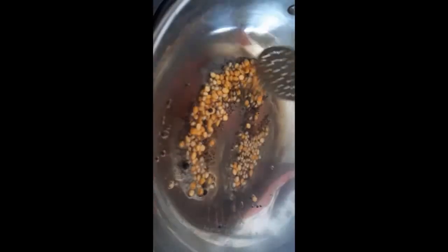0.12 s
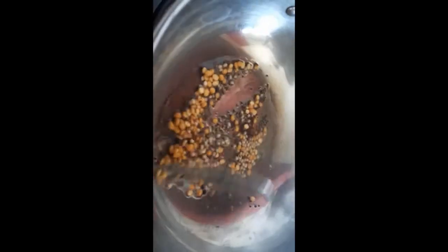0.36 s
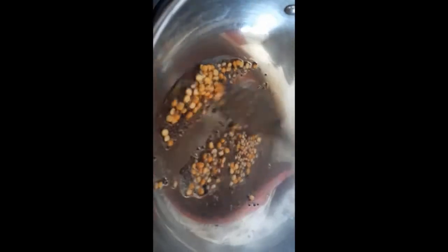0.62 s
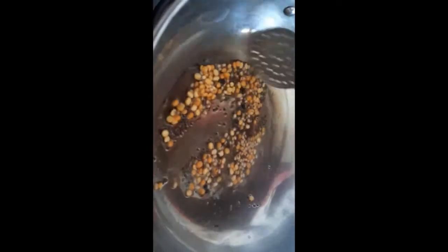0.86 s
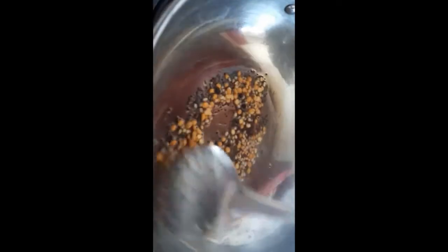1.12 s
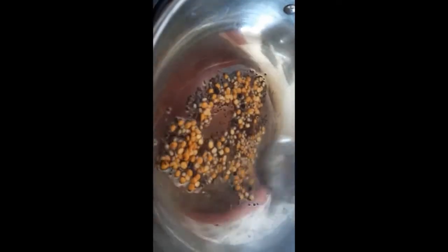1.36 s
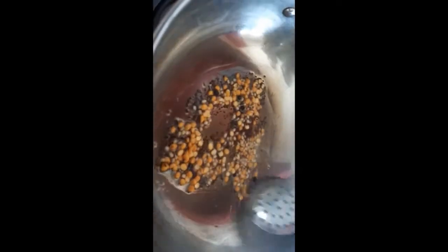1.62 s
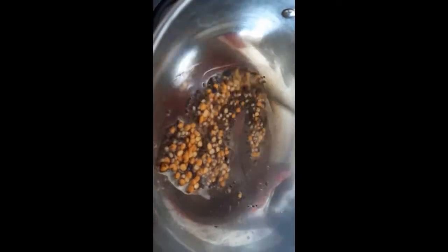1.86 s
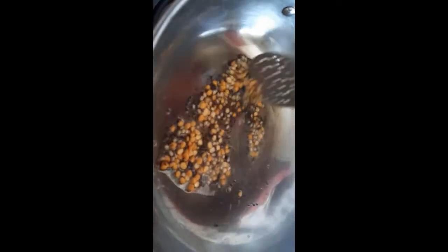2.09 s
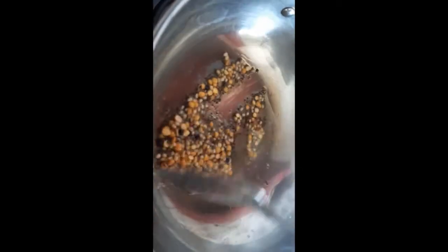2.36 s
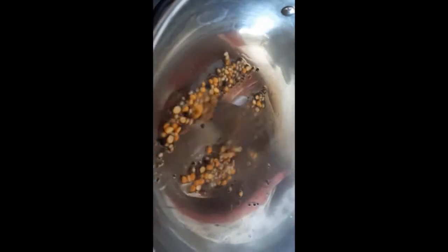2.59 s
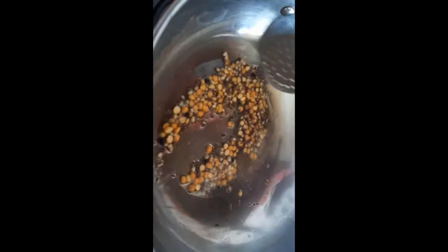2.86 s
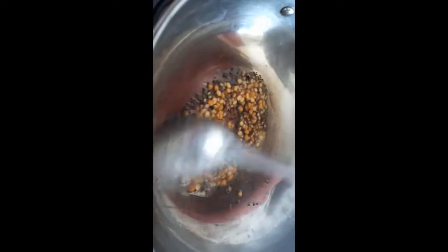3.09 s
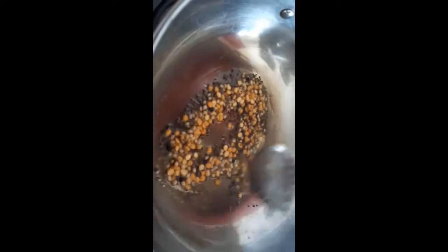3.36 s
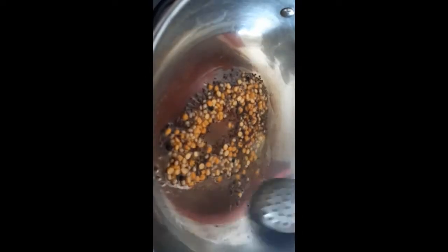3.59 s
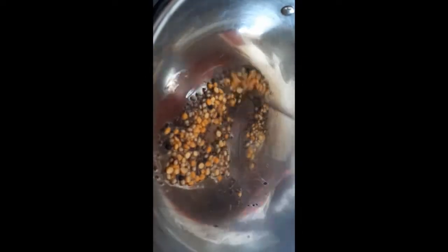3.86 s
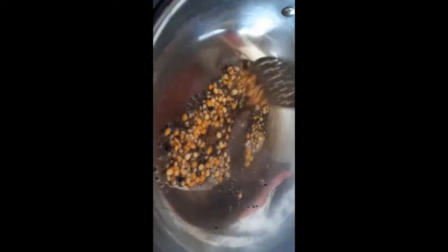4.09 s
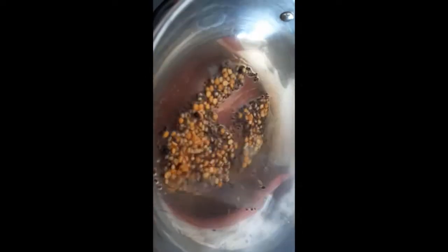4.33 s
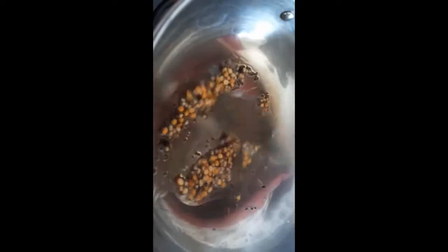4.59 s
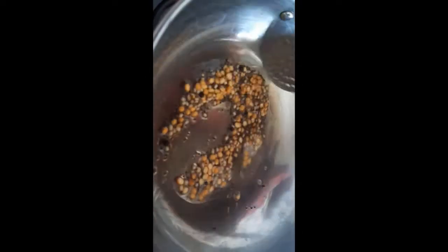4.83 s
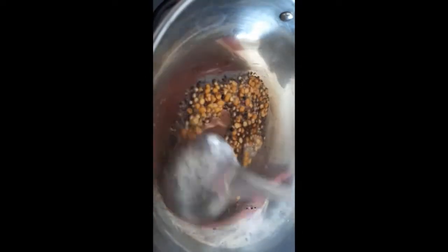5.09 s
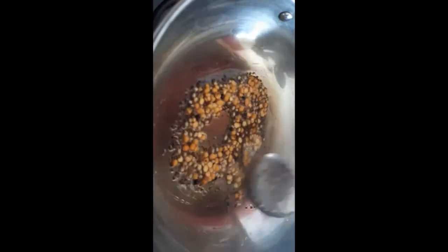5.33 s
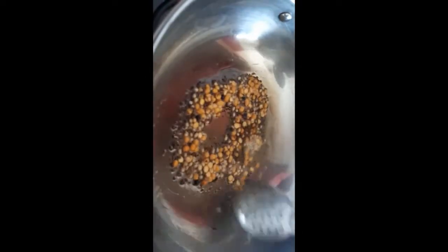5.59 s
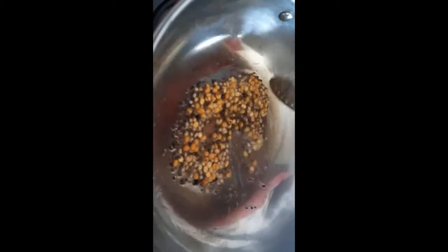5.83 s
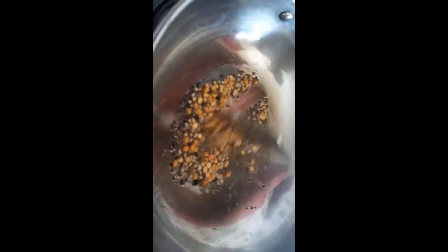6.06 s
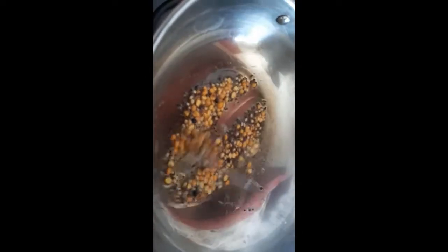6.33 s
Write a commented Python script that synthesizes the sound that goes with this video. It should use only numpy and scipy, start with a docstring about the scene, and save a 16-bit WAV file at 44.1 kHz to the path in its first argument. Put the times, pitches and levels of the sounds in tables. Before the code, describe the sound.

Heard very close in stereo, a steel utensil taps and drags seeds around a metal pan in a kitchen with little echo. Short, quickly damped clanks lead into crisp granular scrapes, at irregular gaps of a fraction of a second. Brief metallic squeaks and a few sharp snaps dot the pauses. The later knocks are strongest, some thumping the stove, over a faint steady oil hiss and fluttering low burner rumble.

```python
"""A steel skimmer stirs seeds and lentils frying in oil in a steel pan, heard close by in stereo. A knock comes
almost at once: a crack and a clatter of clicks that ring the pan. The strokes follow unevenly, each dragging
seeds (dense clicks) between squeaks (gliding noise), pops (single clicks) and spits (noise bursts). From 1.6 s
the harder knocks also thump the stove (a damped low tone), loudest at 3.6 s; the last knock comes just before
the end. Throughout, oil hisses and the flame rumbles below: coloured noise, and noise ringing at two low
pitches."""
import sys
import numpy as np
from scipy import signal
from scipy.fft import rfft, irfft, next_fast_len
from scipy.io import wavfile

SR = 44100
rng = np.random.default_rng(int(sys.argv[2]) if len(sys.argv) > 2 else 0)


def level_to_linear(level):
    """Convert decibel levels to linear amplitude factors, elementwise."""
    exponent = np.asarray(level, float) / 20
    return 10 ** exponent


def to_wav(s):
    """Save 16-bit WAV."""
    ch = np.atleast_2d(s).T  # columns
    pcm = np.round(np.clip(ch, -1, 1) * 32767)  # PCM
    wavfile.write(sys.argv[1], SR, pcm.astype(np.int16))


N = 284263   # length in samples

# The skimmer landing on steel. Each row: time of full force in seconds, strength in dB, deep part in dB
# relative to it, treble part in dB relative to it (all trebles are raised alike later), and the time in
# seconds in which the rattle falls by 60 dB.
LANDINGS = [(0.1068, -12, -13.5, -9.5, 0.021), (0.2239, -27, -17, -42, 0.092), (0.4125, -42, -16, -7, 0.08),
            (0.5075, -41, -37, -12, 0.12), (0.5299, -16.5, -11.5, -15.5, 0.058),
            (0.8779, -16.5, -21.5, -9, 0.041), (1.1335, -32, -24, -27, 0.063),
            (1.232, -25.5, -20, -11, 0.068), (1.608, -14, -22, -10, 0.073), (1.694, -22, -30, -14, 0.069),
            (1.7562, -21.5, -21.5, -15, 0.053), (2.072, -20.5, -17.5, -6.5, 0.057),
            (2.11, -32.5, -24, -4.5, 0.086), (2.507, -14, -15.5, -15, 0.087),
            (2.9013, -39, -28, -10.5, 0.026), (3.007, -20.5, -24, -22, 0.041),
            (3.257, -22.5, -22, -15, 0.046), (3.307, -37, -33, -3, 0.018),
            (3.6232, -5.5, -21.5, -16.5, 0.043), (4.0906, -19.5, -13.5, -4.5, 0.027),
            (4.4847, -8.5, -17.5, -15, 0.066), (4.802, -47, -34, -13, 0.045),
            (4.8728, -21, -16.5, -4, 0.047), (5.047, -50, -24, -19, 0.046), (5.13, -28.5, -16.5, -12, 0.12),
            (5.5387, -11, -22, -10, 0.047), (5.5857, -24, -44, -16, 0.033),
            (5.6064, -18.5, -21, -9.5, 0.059), (5.661, -24.5, -42, -12.5, 0.058),
            (5.9409, -3.5, -10.5, -15, 0.02), (6.2971, -32, -7.5, -22, 0.08),
            (6.4194, -12, -30, -13.5, 0.0096)]
# The blade dragging over the steel. Each row: time of full contact in seconds, length in seconds, level on
# landing in dB, level at lift in dB, treble relative to the rest in dB.
DRAG_STROKES = [(0.161, 0.055, -48, -47, 5), (0.267, 0.14, -57, -55.5, -7), (0.548, 0.079, -55, -46, -4.5),
                (0.91, 0.099, -45.5, -52, 6), (1.065, .19, -45.5, -49, 3.5), (1.618, 0.13, -36, -45, 4),
                (1.798, .14, -49.5, -61.5, 0), (2.095, 0.06, -48.5, -49, 7.5),
                (2.222, 0.099, -67, -54.5, -13), (2.525, 0.1, -45.5, -50, -2.5),
                (2.927, 0.13, -57, -44, -0.5), (3.017, 0.28, -49.5, -44.5, 4),
                (3.648, 0.18, -34.5, -47.5, 2.5), (4.103, 0.065, -40, -45.5, 6),
                (4.25, 0.11, -57, -62.5, -20), (4.515, 0.086, -43, -47.5, 1.5),
                (4.881, 0.13, -49.5, -50, 7), (5.048, 0.17, -45, -51.5, 4.5),
                (5.549, 0.13, -44.5, -40, -0.5), (5.947, 0.077, -37.5, -41.5, 2.5),
                (6.1, 0.18, -56.5, -60.5, -21), (6.285, 0.19, -57, -41.5, -2.5)]
# Seeds jiggling in the oil between strokes. Each row: time in seconds, level in dB.
SEED_JIGGLE = [(0.0, -69.5), (0.45, -71), (0.85, -67), (1.5, -60), (2.0, -87), (2.85, -69.5), (3.5, -65.5),
               (4.0, -81), (4.8, -75), (5.45, -67.5), (5.9, -64), (6.44, -68)]
# Single seeds that burst or snap against the steel. Each row: time in seconds, strength in dB.
SEED_POPS = [(0.3881, -36), (1.866, -34), (1.946, -33.5), (4.4941, -14), (5.9513, -19), (6.2178, -42),
             (6.3143, -33), (6.421, -39)]
# Thin bright spits of oil. Each row: time in seconds, strength in dB.
OIL_SPITS = [(0.446, -34.5), (2.369, -46), (2.47, -69), (4.002, -49.5), (4.4226, -34), (5.475, -47.5),
             (6.389, -38)]
# The ringing tones (modes) of the pan. Each row: pitch in Hz, relative strength in dB, time in seconds to
# fall by 60 dB.
PAN_MODES = [(584.1, -4.5, 0.11), (527, -15, 0.082), (643.3, -13.5, 0.11), (664.6, -16.5, 0.17),
             (778, -19.5, 0.15), (1005.4, -8, 0.11), (1100, -4.5, 0.042), (1267, -4, 0.014),
             (1334, -39, 0.026), (1659, -4.5, 0.055), (1944, -14, 0.097), (2100, -62, 0.13),
             (2550, -57, .1), (2660, -37, 0.047), (3100, -42, 0.035), (3440, -48, 0.047), (3590, -7, 0.047),
             (4223, -16, 0.033), (4300, -14, 0.1), (4943, 7, 0.0093), (5442, 0, 0.035), (6040, 1, 0.051),
             (6230, -3.5, 0.02), (6440, -30, 0.073), (7080, -36, 0.051), (8010, -29, 0.026),
             (11330, -24.5, 0.11), (12930, -23, .05)]
# The dense, short-lived modes between them. Each row: frequency in Hz, relative strength in dB per Hz.
METAL_PUFF = [(120, 7), (250, 13), (600, -2.5), (1100, 12.5), (1700, 3.5), (2500, 13.5), (4000, 13),
              (6500, 10), (7800, 9), (8800, -20), (10500, -4), (13400, -7.5), (15800, -13.5)]
# Dull nudges that wake the low modes of the pan. Each row: time in seconds, strength in dB.
PAN_NUDGES = [(0.132, -33), (0.18, -38), (0.3, -37.5), (0.356, -45), (0.532, -32), (0.878, -42),
              (0.914, -32.5), (1.072, -34.5), (1.608, -33), (1.696, -46), (2.101, -32.5), (2.265, -39),
              (2.35, -48.5), (2.924, -31), (3.008, -36), (3.124, -37), (3.161, -37), (3.682, -44),
              (4.117, -28), (4.211, -41), (4.283, -37.5), (4.378, -43), (4.571, -38.5), (4.874, -31),
              (5.108, -35), (5.541, -31.5), (5.875, -44.5), (5.941, -32), (6.162, -35.5), (6.22, -42.5),
              (6.361, -32)]
# The blade singing as it skims the steel. Each row: start in seconds, length in seconds, start pitch in Hz,
# end pitch in Hz, level at the middle in dB.
BLADE_SQUEAKS = [(0.22, 0.046, 1070, 1084, -43), (1.12, 0.045, 1350, 1426, -45.5),
                 (1.192, 0.039, 1240, 1290, -48.5), (1.549, 0.068, 3280, 3300, -58.5),
                 (1.695, 0.13, 1178, 1100, -49.5), (1.735, .1, 740, 763, -52.5),
                 (2.134, 0.047, 1100, 1100, -61), (2.953, .03, 3300, 3280, -54),
                 (3.154, 0.057, 1344, 1327, -45.5), (3.713, 0.037, 2360, 2410, -47),
                 (3.762, 0.11, 680, 702, -51), (3.804, 0.023, 1070, 1120, -43.5),
                 (4.22, .14, 1052, 1042, -62), (4.967, 0.1, 2050, 2090, -56.5),
                 (4.999, 0.098, 1090, 1104, -56.5), (5.42, 0.05, 3300, 3250, -65),
                 (5.465, 0.04, 2850, 2800, -63.5), (6.002, 0.052, 1070, 1085, -39)]
# The pan rocking and thumping the stove. Each row: time in seconds, strength in dB.
STOVE_THUMPS = [(0.1044, -55), (1.6075, -12.5), (2.509, -80), (3.001, -36), (3.6231, -5.5), (4.4836, -15.5),
                (5.9408, -11), (6.296, -33.5), (6.4209, -20)]
# Colour of the oil hiss. Each row: frequency in Hz, relative strength in dB per Hz.
OIL_HISS = [(18, -50), (30, -40), (130, 8), (198, -10), (244, -8.5), (435, -15), (581, -19.5), (645, -18),
            (1420, -28), (3280, -22.5), (4860, -36), (5990, -25), (9350, -28), (11800, -24.5),
            (15800, -30.5)]
# Resonances in the flame's rumble. Each row: pitch in Hz, width in Hz, level in dB.
FLAME_RESONANCES = [(125.5, 12.4, -65.5), (196.2, 13.6, -64)]
# How the two microphones differ. Each row: frequency in Hz, likeness from 0 to 1, left minus right in dB.
MICROPHONES = [(40, 0.97, 26), (126, 1, 1), (292, 0.84, 0.5), (655, 0.76, 4.5), (1500, 0.36, 0),
               (3140, 0.51, -3), (7740, 0.45, 1.5), (15200, 0.63, 17)]

SPLIT_HZ, TOP_HZ = 1506, 9200   # borders between the deep, middle and top parts
LAND_S, LIFT_DB_PER_S = 0.014, 253   # fade-in of a drag; how fast it dies once the blade lifts
# pushed seeds roll on: level after a -48.5 dB lift, share of the lift level, decay, loss of treble
ROLL_DB, ROLL_FOLLOWS, ROLL_DB_PER_S, ROLL_DULL_DB = -56.5, 0.9, 80.5, -4
# jolts of the deep modes: level relative to a -48 dB drag, and their share of its swing
DEEP_DB, DEEP_FOLLOWS = -7, 0.82
SPIT_T60_S, SPIT_BODY_DB = 0.037, -24   # time to fall by 60 dB; middle relative to treble
STEEL_T60_S, SPOTS = 0.012, 16   # fall of the metallic puff; number of spots on the pan
# the contact is too soft for higher modes; each nudge favours other modes
NUDGE_SOFT_HZ, NUDGE_SPREAD_DB = 695, 3
ROCK_DB, ROCK_T60_S = -38, 0.45   # after a nudge the pan keeps trembling on its stand
SQUEAK_WIDTH_HZ = 85   # corner of the slow noise that roughens a squeak
THUMP_HZ, THUMP_T60_S = 105, 0.018
KITCHEN_T60_S, KITCHEN_DB = 0.18, -13
HISS_DB = -56.5
CUTOFF_HZ = 16000
LEFT_RIGHT = np.array([[1], [-1]])


def rms_one(x):
    """Scales a sound to an average (rms) strength of 1."""
    return x / np.sqrt(np.mean(x ** 2) + 1e-20)


def at_hz(points, hz, column=1):
    """Reads a table between its rows, along a logarithmic frequency scale."""
    points = np.array(points)
    return np.interp(np.log(np.maximum(hz, 1)), np.log(points[:, 0]), points[:, column])


def drift(rate):
    """A slow random wander: straight lines between random points of spread 1, 'rate' points a second."""
    knots = rng.standard_normal(400)
    return np.interp(np.arange(N) / SR * rate, np.arange(len(knots)), knots)


def filtered(x, hz, kind, order):
    """Passes a sound through a Butterworth filter."""
    return signal.sosfilt(signal.butter(order, hz, kind, fs=SR, output="sos"), x)


def clicks(per_s, uneven_db):
    """Random clicks of uneven size; rms 1."""
    sizes = level_to_linear(uneven_db * np.minimum(rng.exponential(1, N), 5)) * rng.choice([-1, 1], N)
    return rms_one(sizes * (rng.random(N) < per_s / SR))


def stereo_noise(spectrum, size):
    """Noise of the given colour, as alike and as lopsided as the two microphones hear it."""
    hz = np.fft.rfftfreq(size, 1 / SR)
    mid, side = rfft(rng.standard_normal((2, size)))
    alike = np.clip(at_hz(MICROPHONES, hz), 0, 1)
    lean_db = at_hz(MICROPHONES, hz, column=2)
    both = np.sqrt(1 + alike) * mid + LEFT_RIGHT * np.sqrt(1 - alike) * side
    gain = level_to_linear(at_hz(spectrum, hz) + LEFT_RIGHT * lean_db / 2)
    return rms_one(irfft(both * gain, size))


def knocks(rise_s=0.000975):
    """Force of each landing: a crack, then a clatter of uneven clicks that dies."""
    force = np.zeros((3, N))      # deep, middle, top
    t = np.arange(4096) / SR
    clatter = rng.standard_normal((len(LANDINGS), 2, 4096)) ** 3
    for (s, strength_db, deep_db, top_db, t60), pair in zip(LANDINGS, clatter):
        at = round((s - rise_s) * SR)
        end = min(len(t), N - at)
        rattle = level_to_linear(-60 * t / max(t60, 0.005))
        crack = level_to_linear(7.5 - 60 * t / 0.0037)
        dying = rattle + crack
        shape = np.minimum(t / rise_s, 1) ** 2 * level_to_linear(strength_db) * dying
        # even out the luck, so that each clatter carries its due energy
        low, high = (x * np.sqrt(np.sum(dying ** 2) / np.sum((x * dying) ** 2)) for x in pair)
        parts = [level_to_linear(deep_db) * low, level_to_linear(-8) * high, level_to_linear(top_db + 6.5) * high]
        force[:, at:at + end] += (shape * parts)[:, :end]
    return force


def drag():
    """Seeds slip under the blade and roll on after it lifts: dense clicks, with rarer jolts of the deep modes."""
    t = np.arange(N) / SR
    # body and top are powers, hence the factor 2 on dB
    body = level_to_linear(2 * np.interp(t, *np.transpose(SEED_JIGGLE)))
    top = body * level_to_linear(2 * ROLL_DULL_DB)
    for s, length, land_db, lift_db, bright_db in DRAG_STROKES:
        after = np.maximum(t - s - length, 0)
        landing = np.clip((t - s) / LAND_S + 1, 0, 1) ** 2
        blade_db = np.interp(t, [s, s + length], [land_db, lift_db]) - LIFT_DB_PER_S * after
        blade = landing * level_to_linear(2 * blade_db)
        roll_db = ROLL_DB + ROLL_FOLLOWS * (lift_db + 48.5) - ROLL_DB_PER_S * after
        roll = (after > 0) * level_to_linear(2 * roll_db)
        body = body + blade + roll
        top = top + blade * level_to_linear(2 * bright_db) + roll * level_to_linear(2 * ROLL_DULL_DB)
    jolts = level_to_linear(DEEP_DB - 48) * (np.sqrt(body) / level_to_linear(-48)) ** DEEP_FOLLOWS
    deep = clicks(1100, uneven_db=1.5) * jolts * level_to_linear(4.3 * drift(40))
    seeds = clicks(5000, uneven_db=3.5) * level_to_linear(1.8 * drift(60))
    return np.array([deep, seeds * np.sqrt(body), seeds * np.sqrt(top)])


def pops():
    """One sharp click each, too light to move the deep modes much."""
    force = np.zeros((3, N))
    for s, strength_db in SEED_POPS:
        force[:, round(s * SR)] = level_to_linear(strength_db + np.array([-8, 9, 6]))   # deep, middle, top
    return force


def spits():
    """A short dying burst of noise each, nearly all treble."""
    force = np.zeros((3, N))
    t = np.arange(2048) / SR
    bursts = rng.standard_normal((len(OIL_SPITS), 2048))
    for (s, strength_db), noise in zip(OIL_SPITS, bursts):
        at = round(s * SR)
        parts_db = np.array([[SPIT_BODY_DB], [0]])   # middle, top
        force[1:, at:at + len(t)] += level_to_linear(strength_db + parts_db - 60 * t / SPIT_T60_S) * noise
    return force


def spot_on_pan(modes_db=-18.5, spread_db=4):
    """What a click at one spot sets off: every mode with a strength of its own, over a quick metallic puff."""
    t = np.arange(8192) / SR
    out = stereo_noise(METAL_PUFF, size=8192) * level_to_linear(-60 * t / STEEL_T60_S)
    for hz, level_db, t60 in PAN_MODES:
        unlike = 1 - np.clip(at_hz(MICROPHONES, hz), 0, 1)
        phase = rng.normal(0, 0.96, (2, 1)) * unlike
        lean_db = LEFT_RIGHT * at_hz(MICROPHONES, hz, column=2) / 2
        gain = level_to_linear(modes_db + level_db + rng.normal(0, spread_db) + lean_db)
        out += gain * level_to_linear(-60 * t / t60) * np.sin(2 * np.pi * hz * t + phase)
    lag = int(rng.integers(0, 14))      # in samples: the spot lies nearer to the left microphone
    out[1] = np.concatenate([np.zeros(lag), out[1, :len(t) - lag]])
    deep = filtered(out, SPLIT_HZ, "low", order=4)
    middle = filtered(out, [SPLIT_HZ, TOP_HZ], "band", order=4)
    top = filtered(out, TOP_HZ, "high", order=4)
    return [part / np.sqrt(np.mean(np.sum(part ** 2, axis=1))) for part in (deep, middle, top)]


def pan(forces):
    """The contact wanders over many spots of the pan, each ringing with a voice of its own."""
    place = np.argmax([drift(35) for spot in range(SPOTS)], axis=0)
    stray = rng.random(N) < 0.2      # stray seeds touch anywhere
    place = np.where(stray, rng.integers(0, SPOTS, N), place)
    size = next_fast_len(N + 8192)
    out = 0
    for spot in range(SPOTS):
        for force, voice in zip(forces, spot_on_pan()):
            # multiplying spectra makes every click of the force set off the voice
            out = out + rfft(force * (place == spot), size) * rfft(voice, size)
    return irfft(out, size)[:, :N]


def nudges():
    """A soft contact: a short push into the low modes, then a dying tremble of tiny pushes."""
    s, strength_db = np.transpose(PAN_NUDGES)
    at = np.round(s * SR).astype(int)
    chance = rng.standard_normal((len(s), len(PAN_MODES)))
    tremble = level_to_linear(ROCK_DB) * clicks(200, uneven_db=0.5)
    first_hz, first_db = PAN_MODES[0][:2]
    out = np.zeros(N)
    for (hz, level_db, t60), luck in zip(PAN_MODES[:10], chance.T):
        push = np.full(N, 1e-18)
        luck_db = NUDGE_SPREAD_DB * luck * (hz != first_hz)      # the first mode is never varied
        softness = 1 + (hz / NUDGE_SOFT_HZ) ** 4
        push[at] = level_to_linear(strength_db + level_db - first_db + luck_db) / softness
        push += tremble * signal.lfilter([1], [1, -level_to_linear(-60 / (ROCK_T60_S * SR))], push)
        # a resonator: each push starts a dying sine
        r, w = level_to_linear(-60 / (t60 * SR)), 2 * np.pi * hz / SR
        out += signal.lfilter([0, np.sin(w)], [1, -2 * r * np.cos(w), r * r], push)
    return filtered(out, [450, 1200], "band", order=2) * level_to_linear(1.5 * LEFT_RIGHT)


def squeaks():
    """Short rough whistles of steel on steel: a narrow band of noise that glides."""
    t = np.arange(N) / SR
    out = np.zeros(N)
    a, b = filtered(rng.standard_normal((2, N)), SQUEAK_WIDTH_HZ, "low", order=2)
    for s, length, start_hz, end_hz, level_db in BLADE_SQUEAKS:
        along = np.clip((t - s) / length, 0, 1)
        turn = 2 * np.pi * np.cumsum(start_hz + (end_hz - start_hz) * along) / SR
        whistle = rms_one(a * np.cos(turn) + b * np.sin(turn))
        out += level_to_linear(level_db) * np.sin(np.pi * along) * whistle
    return out


def thumps():
    """A heavily damped low push, heard mostly on the left."""
    out = np.zeros((2, N))
    t = np.arange(4096) / SR
    right_shares = rng.uniform(0.098, 0.1, len(STOVE_THUMPS))
    for (s, strength_db), right in zip(STOVE_THUMPS, right_shares):
        at = round(s * SR)
        push = -np.sin(2 * np.pi * THUMP_HZ * t) * level_to_linear(strength_db + 1 - 60 * t / THUMP_T60_S)
        out[:, at:at + len(t)] += push[:N - at] * [[1], [right]]
    return out


def kitchen(x):
    """The room's echo: a dull noise-like tail, its own in each channel."""
    t = np.arange(20000) / SR
    dull = filtered(rng.standard_normal((2, len(t))), 5300, "low", order=1)
    tail = dull * level_to_linear(-60 * t / KITCHEN_T60_S) * (t > 0.004)
    tail /= np.sqrt(np.sum(tail ** 2, axis=1, keepdims=True))
    return level_to_linear(KITCHEN_DB) * signal.fftconvolve(x, tail, axes=1)[:, :N]


def oil_and_flame():
    """A smooth hiss of coloured noise, and a fluttering rumble: noise ringing at two low resonances."""
    out = level_to_linear(HISS_DB + 0.5 * drift(24)) * stereo_noise(OIL_HISS, size=N)
    for hz, width, level_db in FLAME_RESONANCES:
        r = np.exp(-np.pi * width / SR)
        flame = stereo_noise([(20, 0), (20000, 0)], size=N)
        ring = signal.lfilter([1, 0, -1], [1, -2 * r * np.cos(2 * np.pi * hz / SR), r * r], flame)
        out += level_to_linear(level_db + 6.8 * drift(20)) * rms_one(filtered(ring, 406, "low", order=2))
    return out


def scene():
    """Adds the steel sounds and their echo to the thumps, the oil and the flame."""
    steel = pan(knocks() + drag() + pops() + spits()) + nudges() + squeaks()
    return steel + kitchen(steel) + thumps() + oil_and_flame()


def top_cut(x):
    """Nothing passes above the cut-off."""
    return signal.sosfilt(signal.butter(12, 16990, fs=SR, output="sos"), x)


def record(dry):
    """The top is cut, and the microphone loses the deepest bass."""
    cut = signal.sosfilt(signal.cheby2(16, 32, CUTOFF_HZ, fs=SR, output="sos"), dry)
    mix = filtered(cut, 74, "high", order=2)
    return top_cut(mix)


dry = scene()
out = record(dry)
to_wav(out)
```